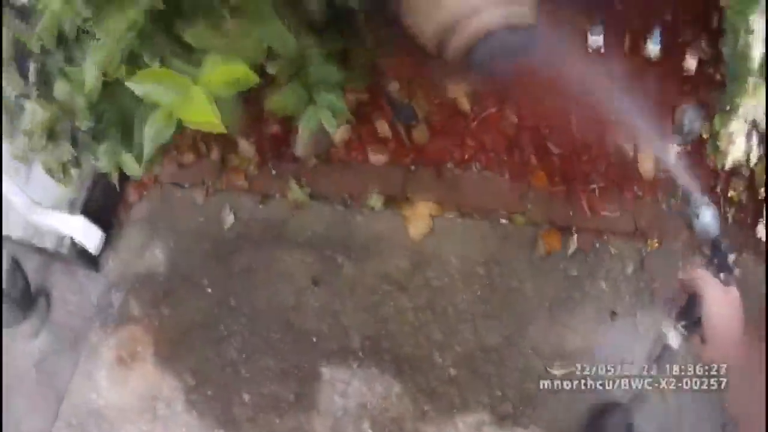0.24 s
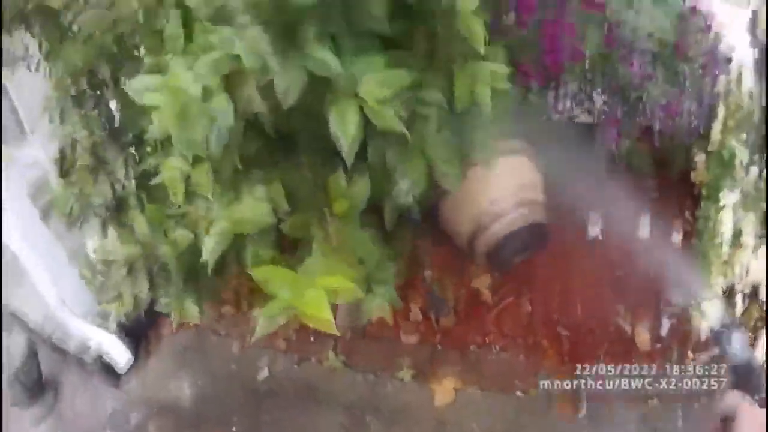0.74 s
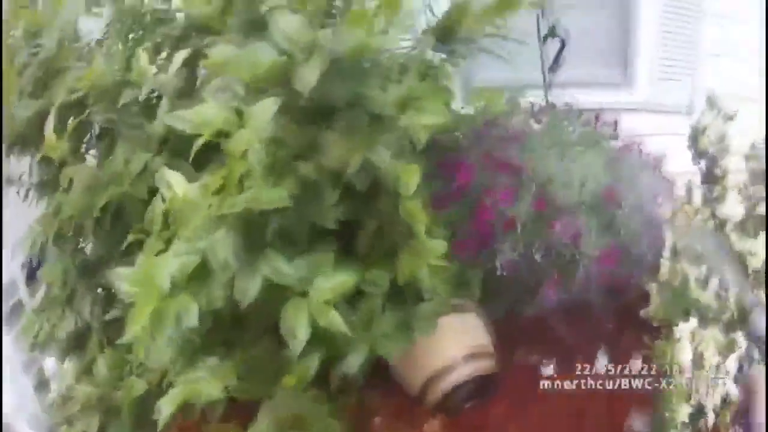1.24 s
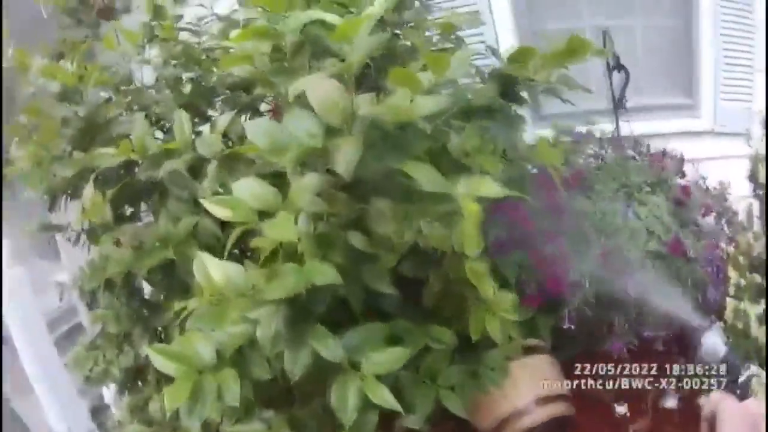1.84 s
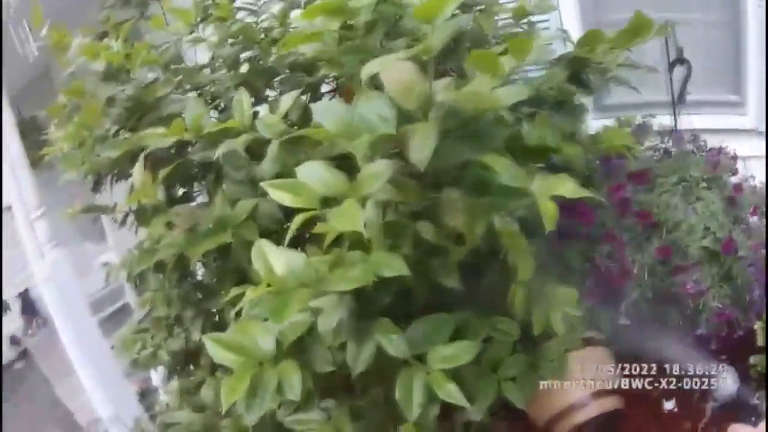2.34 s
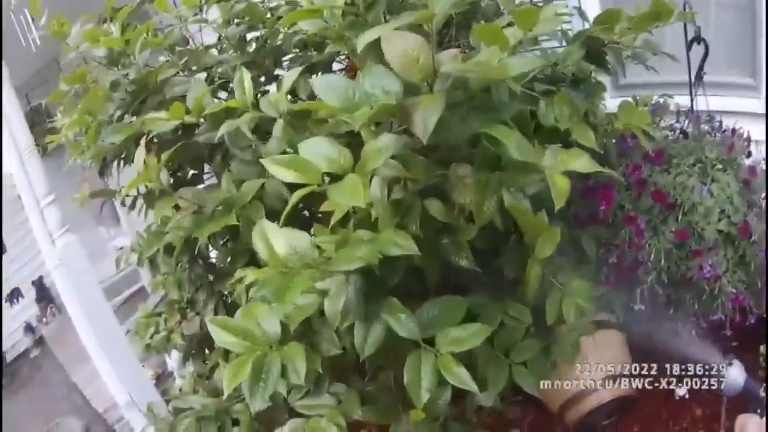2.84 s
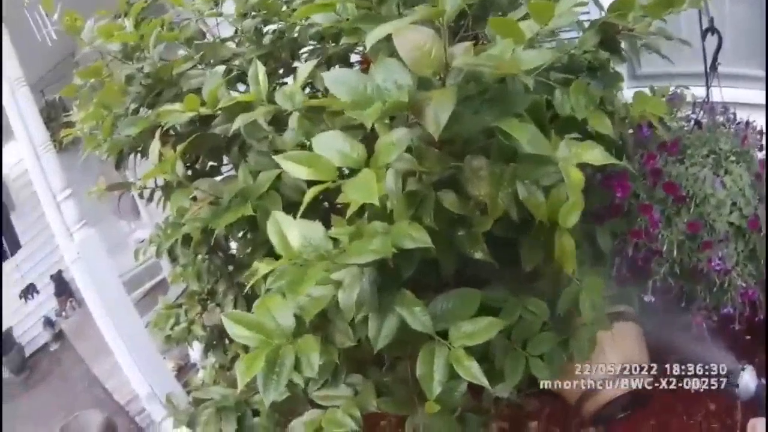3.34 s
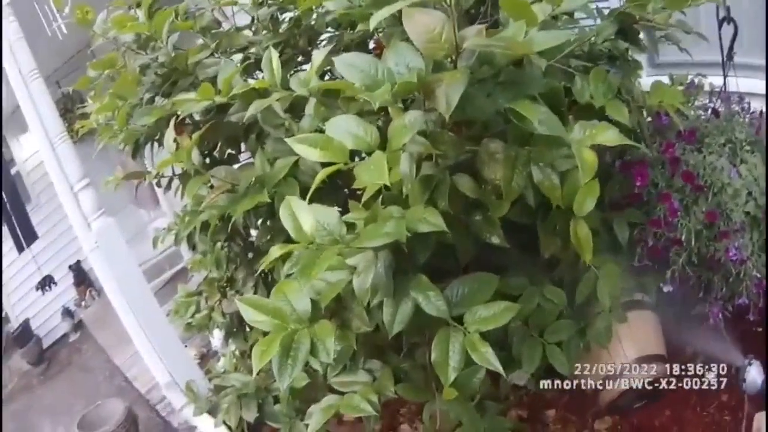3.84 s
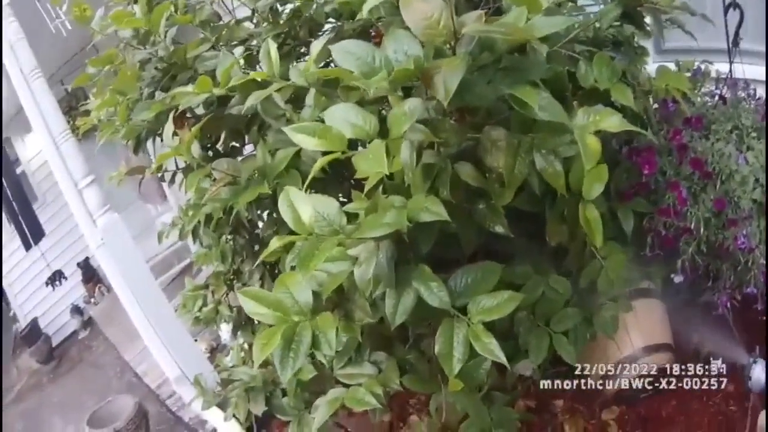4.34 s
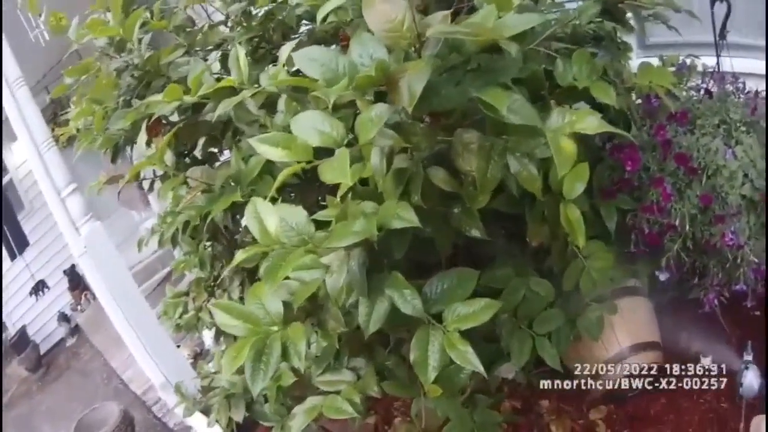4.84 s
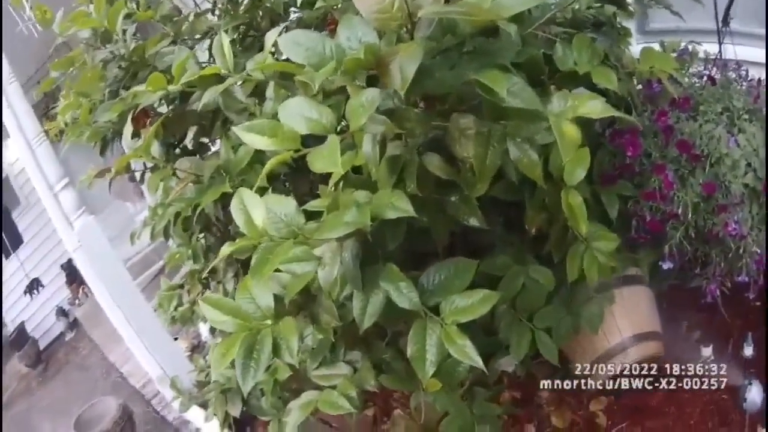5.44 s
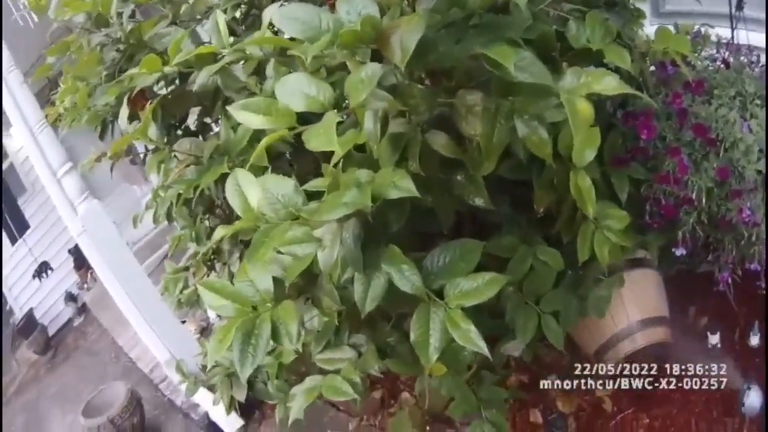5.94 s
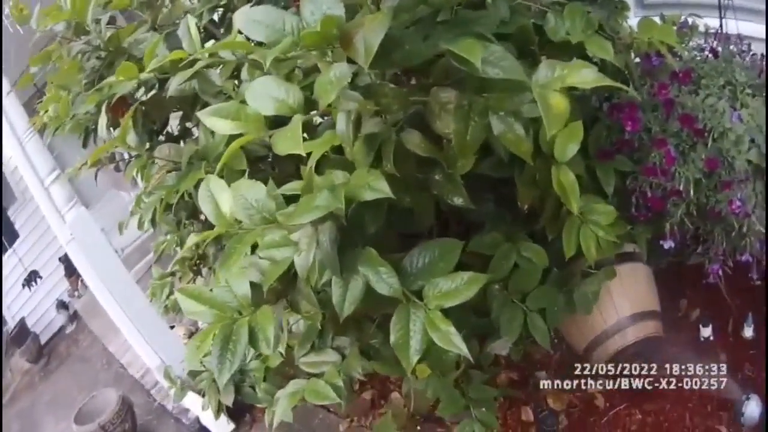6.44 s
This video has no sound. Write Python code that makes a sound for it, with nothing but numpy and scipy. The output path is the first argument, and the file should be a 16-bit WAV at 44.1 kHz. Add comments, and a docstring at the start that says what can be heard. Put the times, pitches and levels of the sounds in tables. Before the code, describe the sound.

Only low wind rumble and a single drop are heard at 0 s; within about 0.1 s a hose nozzle opens, with fine airy mist and a dull splash on the ground. By 0.5 s it is a strong, bright, grainy patter on leaves, colored by a narrow high resonance. It dips around 1.2-1.5 s, fluttering as the jet sweeps near leaves, then returns stronger and peaks near 2.2 s. Loud sharp drops snap close by from 0.7 to 2.3 s, another at 3 s. Short hollow thuds and a sloppy gush land around 1.7-2.0 s. From 3 s the spray is steady and slowly weakens, still running at 6.7 s; several drops click after 6.2 s. Low wind booms buffet at 1.3-2.9 s and again near 6.3 s, with a very faint low hum. Close, dry, outdoor, essentially mono.

```python
"""A garden hose nozzle opens and sprays leaves and mulch: noise and random clicks make a bright patter.
A microphone port resonance colours that patter; a duller noise band makes the splash on the ground.
Large drops are short rings with a sharp tick, and thuds are lower, hollow rings.
Behind them lie a gusty wind rumble of shaped noise, low booms and a faint hum, both fuzzy tones.
One microphone feeds both channels, each with its own constant offset."""
import sys
import numpy as np
from scipy import signal
from scipy.fft import next_fast_len
from scipy.io import wavfile
from scipy.ndimage import uniform_filter1d

SR = 44100
rng = np.random.default_rng(int(sys.argv[2]) if len(sys.argv) > 2 else 0)


def bounce(signal):
    """Save signal as a 16-bit WAV file at the path given by the first command-line argument."""
    frames = np.transpose(np.atleast_2d(signal))
    limited = np.clip(frames, -1, 1)
    pcm = np.round(limited * 32767).astype(np.int16)
    wavfile.write(sys.argv[1], SR, pcm)


N = 294588  # length in samples

# Deep rumble of wind on the microphone, before its gusts: [t/s, level/dB]
WIND_LEVEL = [(0.0, -34.5), (0.7, -35.5), (1.3, -41), (1.5, -35.5), (3.4, -36.5), (4.1, -41.5), (4.55, -38),
              (6.68, -36)]
# Tone colour of the rumble; only the shape matters: [f/Hz, level/dB]
RUMBLE_SPECTRUM = [(1, -20), (5, -12), (15, -8), (30, 13), (40, -3), (65, -5.5), (90, -4.5), (110, -13.5),
                   (160, -12.5), (300, -46.5)]
# Low booms of buffeting air: [peak t/s, f/Hz, level/dB, half length/s]
BOOM_SWELLS = [(0.0, 46, -38, .1), (0.76, 44.8, -37, 0.085), (1.11, 42.26, -37, .04),
               (1.27, 50.6, -26, .075), (1.418, 48.1, -23, 0.043), (1.54, 46.2, -29.5, 0.13),
               (1.945, 53.42, -28, .035), (2.607, 42.47, -31, 0.045), (2.88, 51.7, -35, .05),
               (3.5, 60.53, -48.5, .4), (4.3, 50, -48, 0.14), (4.91, 53.4, -38, 0.06),
               (5.23, 51.7, -38, 0.075), (5.777, 52.1, -41.5, .12), (6.315, 52.9, -28.5, .05),
               (6.49, 51.2, -34, 0.054), (6.68, 46.4, -32, 0.029)]
# Fuzzy hum, before it wavers: [t/s, level/dB]
HUM_LEVEL = [(0.0, -71), (1.55, -55), (1.75, -46.5), (2.7, -59), (3.9, -47.5), (6.68, -48)]
# Slugs of water thudding on something hollow: [t/s, level/dB, f/Hz]
THUD_HITS = [(1.729, -28, 520), (1.728, -32, 350), (1.718, -33, 115), (1.866, -37, 420), (2, -26, 780),
             (1.894, -32, 430), (1.904, -29, 360), (1.908, -28, 780)]
# Large single drops on near leaves: [t/s, peak level/dB, f/Hz]
DROP_HITS = [(.0183, -24, 4200), (.335, -28, 8000), (0.734, -11, 4540), (0.942, -11, 4100),
             (.9533, -13, 4360), (1.0726, -7.5, 4420), (1.111, -11, 4600), (1.1835, -10, 5130),
             (1.4105, -14.5, 4680), (1.471, -16, 4420), (1.699, -11, 4300), (1.872, -13, 4360),
             (2.046, -10, 4320), (2.0676, -13, 3980), (2.21, -8, 4040), (2.245, -19, 6200),
             (2.3052, -15, 4060), (2.9789, -10, 4610), (6.175, -8.5, 4370), (6.4837, -13, 4900),
             (6.56, -12, 3980), (6.6189, -21, 3770)]
# Force of the jet on the leaves, as patter before swells and surges: [t/s, level/dB]
JET_FORCE = [(0, -48), (.05, -45), (.075, -38), (.102, -38), (.118, -29), (.16, -28), (.3, -28), (.4, -27),
             (.52, -23), (.8, -22), (1.0, -24), (1.16, -30), (1.4, -29.5), (1.55, -27.5), (1.64, -23),
             (1.8, -24), (2.2, -21), (2.45, -23), (3.0, -23.5), (3.9, -25.5), (5.2, -27), (6.1, -30),
             (6.68, -32.5)]
# The jet sweeps across a near leaf and the patter swells: [t/s, swell/dB]
LEAF_SWEEPS = [(.86, 3.5), (1.1, 2.5), (1.2, 2.5), (1.27, 2.5), (1.49, 2.5), (1.71, 0.5), (1.88, 4.5),
               (2.05, 3), (2.09, 3)]
# Where the jet lands: [t/s, ground splash level/dB, splash gain below 480 Hz/dB,
# fine mist gain above the port resonance/dB, coarse drop gain below it/dB]
JET_AIM = [(0, -54, 2, 3, -2), (.045, -42, 1, 6, -2), (.125, -32.5, 1, 2, 0.5), (.3, -34, -1, 2.5, 1),
           (.6, -36, -3, 0, -4), (1.2, -42.5, 5, 4, -3.5), (1.9, -40.5, -0.5, -2, -1.5),
           (2.6, -41.5, 1, -0.5, -3), (4.1, -42, -3, -1, -1.5), (5.4, -42, -2.5, -3, -0.5),
           (6.0, -41, -3, -2.5, 1), (6.68, -42.5, 0.5, -3.5, 1)]
# Gushes that slop over the ground around the thuds: [t/s, level/dB, half length/s]
GROUND_GUSHES = [(1.731, -48, .012), (1.89, -38, 0.031)]
# Tone colour of the patter, with the port resonance; only the shape matters: [f/Hz, level/dB]
PATTER_SPECTRUM = [(900, -27.5), (1600, -19), (2100, -9), (3200, -7), (4000, -5), (4400, -4), (4800, -6),
                   (5200, -9), (6500, -17.5), (8000, -25), (11000, -37.5), (15000, -56)]
# Tone colour of the splash; only the shape matters: [f/Hz, level/dB]
SPLASH_SPECTRUM = [(70, -11), (130, -2.5), (250, -1), (500, -2.5), (1200, -1), (1700, -5.5), (2600, -16),
                   (5000, -49)]
# Tone colour of the low flutter that differs between channels: [f/Hz, level/dB]
UNLIKE_SPECTRUM = [(10, 2), (80, 5), (120, -5), (200, -25), (400, -46), (800, -53)]
# Constant offset, one row each for left and right: [share of full scale]
CHANNEL_OFFSETS = [
    [.2345],
    [.0155],
]

HUM_HZ = 118.8
HUM_WAVER_DB, GUSTY_DB = 1.5, 1.2  # typical wander of the hum and rumble levels
MURMUR_DB = -46  # the boom between its swells
TICK_DB = -9  # sharp tick against the ring of a drop
SWEEP_S = 0.032  # half length of each leaf sweep
UNLIKE_DB = -53.5
EDGE_HZ = 15010  # top of the microphone's band


def gain_of(db):
    """Turns decibels into an amplitude factor."""
    return 10 ** (np.asarray(db) / 20)


def evened(x):
    """Scales a sound to unit average strength (RMS)."""
    return x / np.sqrt(np.mean(x ** 2) + 1e-20)


def read(points, hz):
    """Reads a spectrum table between its points, along a logarithmic pitch axis."""
    f, value = np.transpose(points)
    return np.interp(np.log(hz + 1), np.log(f + 1), value)


def curves(rows):
    """Draws each column of a table, after its times, as a value at every sample."""
    s, *columns = np.transpose(rows)
    return [np.interp(np.arange(N) / SR, s, column) for column in columns]


def coloured(x, points):
    """Gives x the spectrum of the points, causally, so that clicks stay sharp in front."""
    size = next_fast_len(len(x))
    hz = abs(np.fft.fftfreq(size, 1 / SR))
    log_gain = np.log(gain_of(read(points, hz)))
    response = np.exp(np.conj(signal.hilbert(log_gain)))  # the matching minimum phase
    return np.fft.ifft(np.fft.fft(x, size) * response).real[:len(x)]


def resonate(x, hz, width):
    """Shifts the curve hz down to zero, smooths, and shifts back: a resonance of gain 1."""
    turn = np.exp(2j * np.pi * np.cumsum(hz * np.ones(len(x))) / SR)
    r = np.exp(-np.pi * width / SR)
    smooth = signal.lfilter([1 - r], [1, -r], x / turn)
    return 2 * (turn * smooth).real


def fuzzy(hz, width, fuzz):
    """A tone on the curve hz with a narrow band of noise around it."""
    noise = rng.standard_normal(N)
    noise = evened(resonate(resonate(noise, hz, width), hz, width))
    turns = np.cumsum(hz * np.ones(N)) / SR + rng.random()
    tone = np.sqrt(2) * np.sin(2 * np.pi * turns)
    return (tone + fuzz * noise) / np.sqrt(1 + fuzz ** 2)


def flicker(hz):
    """Slow chance of unit size that wavers up to about hz times a second."""
    low_pass = signal.butter(2, hz, fs=SR, output="sos")
    return evened(signal.sosfilt(low_pass, rng.standard_normal(N)))


def swells(times, heights, lengths):
    """Bell-shaped swells of the given heights and half lengths, added together."""
    t = np.arange(N) / SR
    return sum(h * np.exp(-((t - s) / d) ** 2) for s, h, d in np.broadcast(times, heights, lengths))


def lifted(x, hz, kind, db):
    """Raises or lowers what lies beyond hz by the curve db."""
    band = signal.sosfiltfilt(signal.butter(2, hz, kind, fs=SR, output="sos"), x)
    return x + (gain_of(db) - 1) * band


def ring(hz, cycles, size):
    """A tone that swells for the given cycles and then dies away."""
    turns = np.arange(size) * hz / SR
    envelope = turns / cycles * np.exp(1 - turns / cycles)
    return envelope * np.sin(2 * np.pi * turns)


def add(mix, s, sound):
    """Adds a sound into the mix from s seconds on, cut off at the end."""
    part = mix[round(s * SR):][:len(sound)]
    part += sound[:len(part)]


def impacts(per_s, spread_db):
    """Clicks of random sign at random moments; a few are much larger."""
    size = gain_of(spread_db * np.minimum(rng.exponential(1, N), 4.5))
    sign = rng.choice([-1., 1.], N)
    happens = rng.random(N) < per_s / SR
    return evened(size * sign * happens)


def drifting(shape, pitch_bins, frames):
    """Random patches of unit size, smoothed over pitch and time."""
    across_pitch = uniform_filter1d(rng.standard_normal(shape), size=pitch_bins, axis=0)
    return evened(uniform_filter1d(across_pitch, size=frames, axis=1))


def patchy(x, patchy_db, fine_db):
    """Lifts and lowers random wide and small patches of time and pitch, for an uneven, grainy texture."""
    z = signal.stft(x, nperseg=512, noverlap=384)[2]
    wide = drifting(z.shape, pitch_bins=16, frames=30)
    fine = drifting(z.shape, pitch_bins=2, frames=12)
    gain = gain_of(patchy_db * wide + fine_db * fine)
    return signal.istft(z * gain, nperseg=512, noverlap=384)[1][:N]


def hum():
    """A steady-pitched fuzzy tone whose level wavers."""
    level_db = curves(HUM_LEVEL)[0] + HUM_WAVER_DB * flicker(hz=4.1)
    return gain_of(level_db) * fuzzy(HUM_HZ, 16, fuzz=1.1)


def booms():
    """Buffeting air as one fuzzy low tone that swells and slides from pitch to pitch."""
    s, hz, db, length = np.transpose(BOOM_SWELLS)
    pitch = np.interp(np.arange(N) / SR, s, hz)
    level = gain_of(MURMUR_DB) + swells(s, gain_of(db), length)
    return level * fuzzy(pitch, 16, fuzz=.4)


def wind_rumble():
    """Wind on the microphone as deep shaped noise with a lumpy level."""
    level_db = curves(WIND_LEVEL)[0] + GUSTY_DB * flicker(hz=6)
    return gain_of(level_db) * evened(coloured(rng.standard_normal(N), RUMBLE_SPECTRUM))


def thuds(cycles=1.05):
    """Slugs of water strike something hollow, which rings briefly."""
    out = np.zeros(N)
    for s, db, hz in THUD_HITS:
        add(out, s, gain_of(db) * ring(hz, cycles, size=1500))
    return out


def large_drops(cycles=1.1):
    """A drop rings behind a tick coloured by the port; droplets splash off just after it."""
    out = np.zeros(N)
    tick = coloured(signal.unit_impulse(2048), PATTER_SPECTRUM)[:600]
    tick /= abs(tick).max()
    chances = rng.random((len(DROP_HITS), 2, 4))  # four droplets: lateness and size
    for (s, db, hz), (late, size) in zip(DROP_HITS, chances):
        drop = ring(hz, cycles, size=600) + gain_of(TICK_DB) * tick
        drop = gain_of(db) * drop / abs(drop).max()
        add(out, s, drop)
        for delay, share in zip(.0015 + 0.0095 * late, 0.44 * size):
            add(out, s + delay, share * drop)
    return out


def splash(surge_db):
    """Water on the ground: dull patchy noise and clicks, following the surges weakly, plus gushes."""
    level_db, depth_db, _, _ = curves(JET_AIM)
    water = 0.96 * rng.standard_normal(N) + 0.25 * impacts(400, spread_db=3.5)
    water = patchy(water, patchy_db=1.07, fine_db=1.24)
    water = evened(coloured(water, SPLASH_SPECTRUM))
    water = lifted(water, 480, "low", depth_db)
    s, db, length = np.transpose(GROUND_GUSHES)
    gushes = swells(s, gain_of(db), length)
    return (gain_of(level_db + 0.18 * surge_db) + gushes) * water


def patter(surge_db):
    """Drops on leaves: noise for countless small ones, clicks for larger ones, port-coloured."""
    _, _, mist_db, coarse_db = curves(JET_AIM)
    s, swell_db = np.transpose(LEAF_SWEEPS)
    level_db = curves(JET_FORCE)[0] + swells(s, swell_db, SWEEP_S)
    water = 0.82 * rng.standard_normal(N) + 0.51 * impacts(3000, spread_db=3.0)
    water = patchy(water, patchy_db=0.36, fine_db=0.92)
    water = evened(coloured(water, PATTER_SPECTRUM))
    water = lifted(water, 6800, "high", mist_db)
    water = lifted(water, 3040, "low", coarse_db)
    return gain_of(level_db + surge_db) * water


def spray():
    """The jet breaks up in clumps, so the same surges move the patter and the duller splash."""
    surge_db = 0.16 * flicker(hz=25) + 0.69 * flicker(hz=125)
    return patter(surge_db) + splash(surge_db)


def scene():
    """Adds all the sources and gives both channels the same sound."""
    wind = wind_rumble() + booms()
    mono = spray() + large_drops() + thuds() + wind + hum()
    return np.array([mono, mono])


def record(dry):
    """Adds a faint low flutter of opposite sign in the two channels, limits the band, adds offsets."""
    unlike = gain_of(UNLIKE_DB) * evened(coloured(rng.standard_normal(N), UNLIKE_SPECTRUM))
    wet = dry + unlike * np.array([[1], [-1]])
    low_pass = signal.firwin(2047, EDGE_HZ, window=("kaiser", 9), fs=SR)
    return signal.oaconvolve(wet, low_pass[None], "same") + CHANNEL_OFFSETS


dry = scene()
out = record(dry)
bounce(out)
```